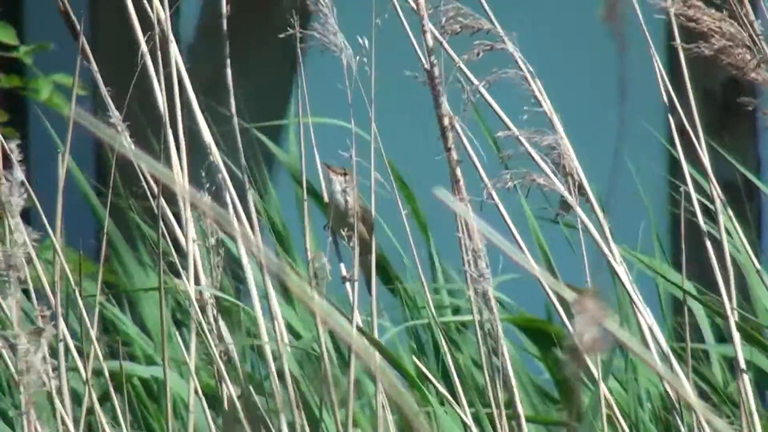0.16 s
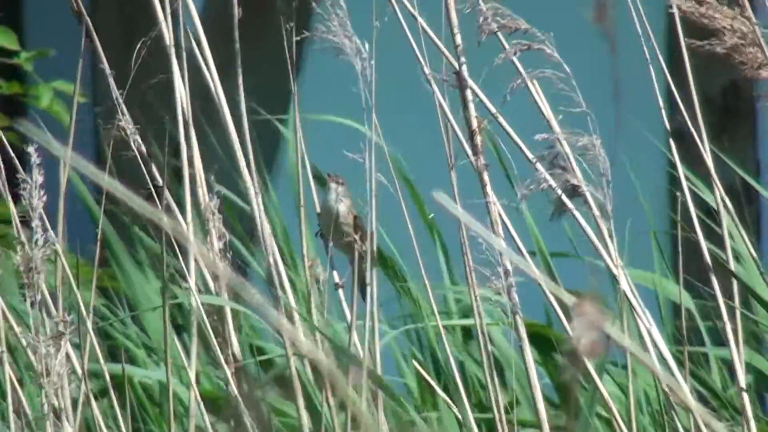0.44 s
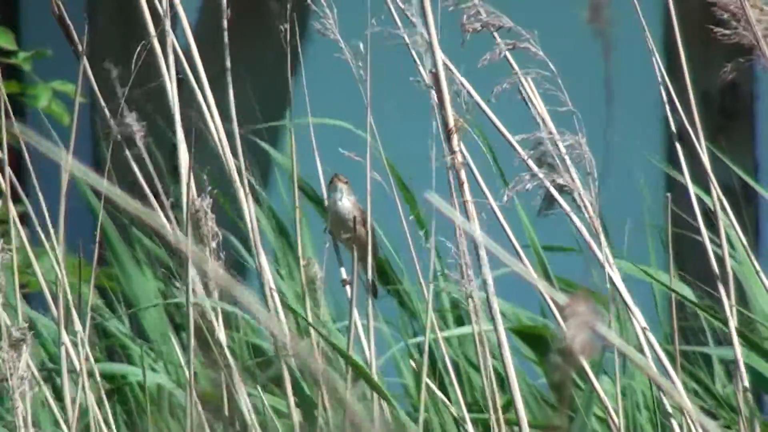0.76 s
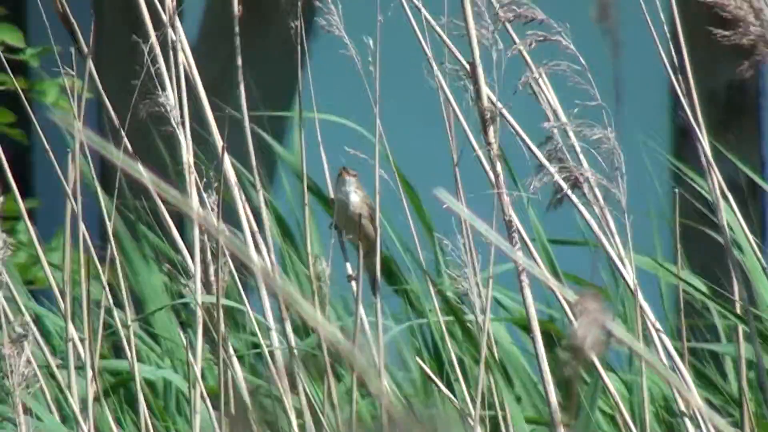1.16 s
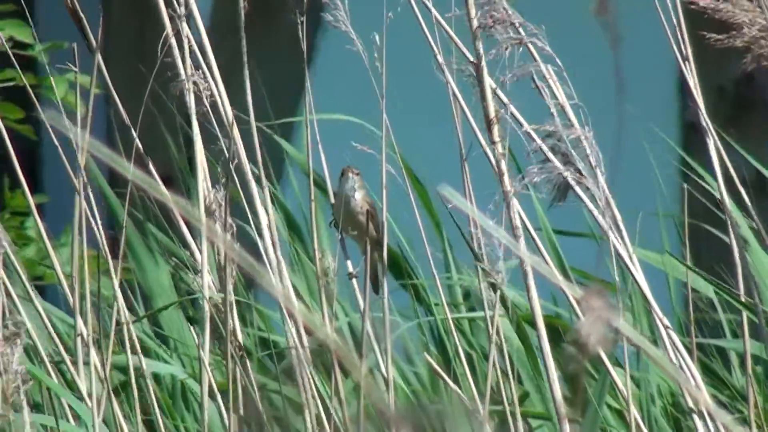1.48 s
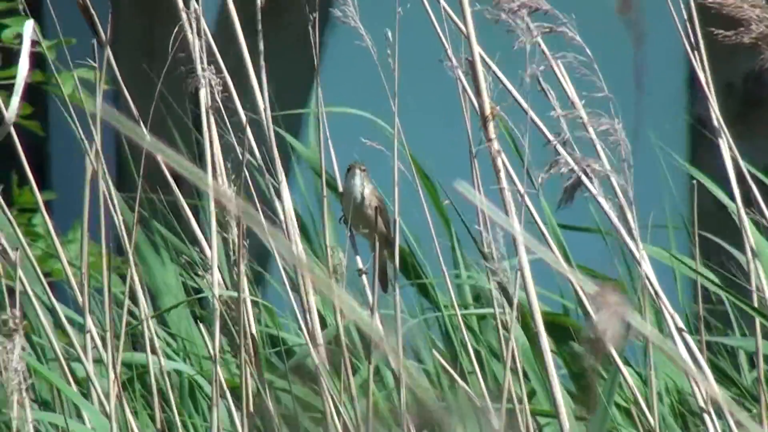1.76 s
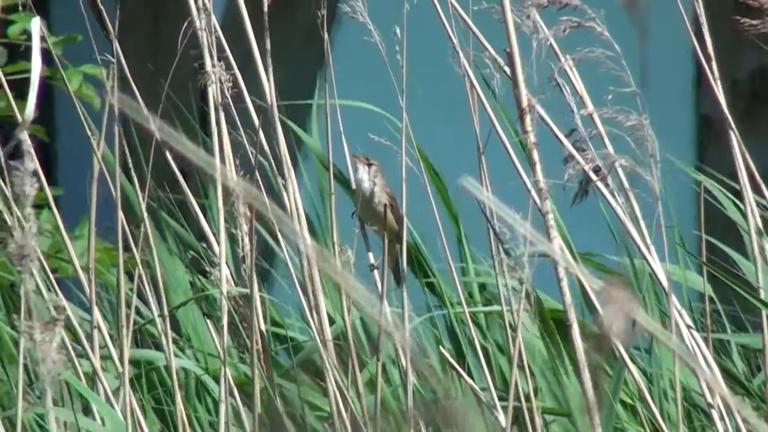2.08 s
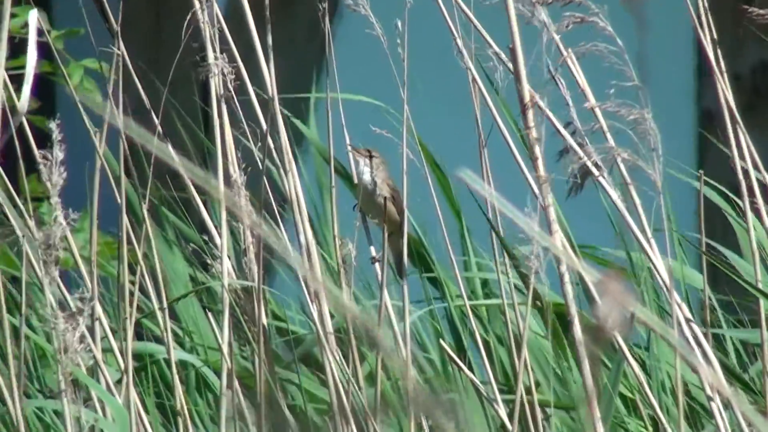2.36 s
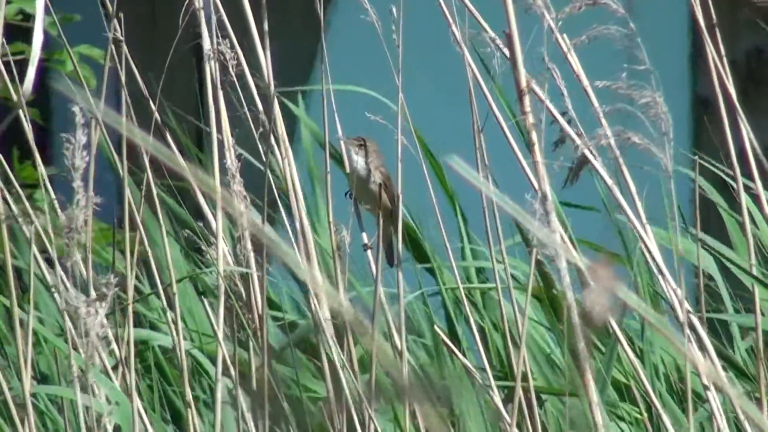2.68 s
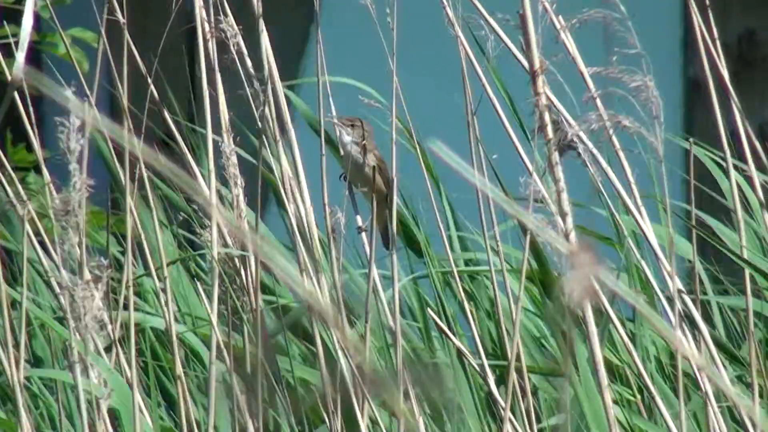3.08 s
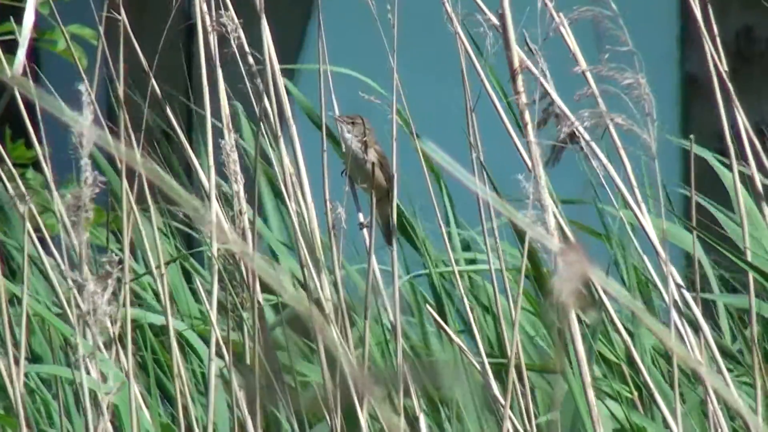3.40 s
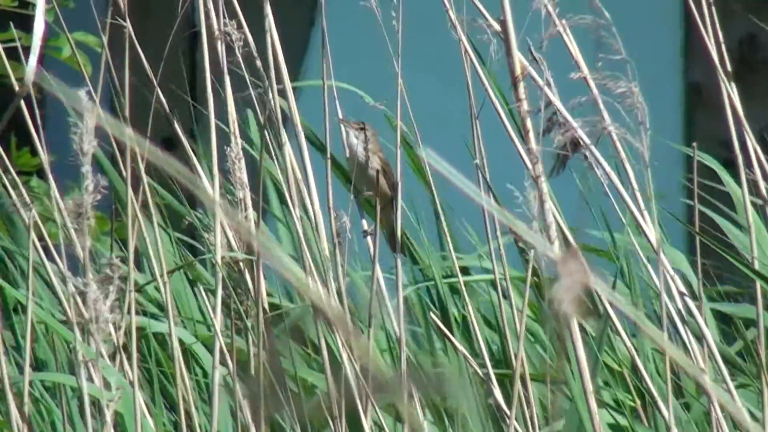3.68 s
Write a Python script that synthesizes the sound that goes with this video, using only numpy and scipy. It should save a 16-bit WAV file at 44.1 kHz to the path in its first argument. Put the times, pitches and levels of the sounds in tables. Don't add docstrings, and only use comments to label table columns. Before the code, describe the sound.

Small bird chatters and trills in short bursts among reeds, with low soft wind behind.

```python
import sys
import numpy as np
from scipy import signal
from scipy.fft import rfft, irfft
from scipy.io import wavfile
from scipy.ndimage import uniform_filter1d

SR = 44100
rng = np.random.default_rng(int(sys.argv[2]) if len(sys.argv) > 2 else 0)


def wav_out(sig):
    wavfile.write(sys.argv[1], SR, np.round(np.clip(np.atleast_2d(sig).T, -1, 1) * 32767).astype(np.int16))


def attenuation_scalar(level_db):
    decades = np.asarray(level_db, float) / 20
    return 10 ** decades


N = 169344
t = np.arange(N) / SR


def along(table, hz):
    points = np.array(table)
    return np.interp(np.log(hz), np.log(points[:, 0]), points[:, 1])


def walk(rate, size):
    k = max(int(SR / rate), 1)
    noise = rng.standard_normal(size + 2 * k)
    smooth = uniform_filter1d(uniform_filter1d(noise, k), k)
    return smooth[k:k + size] * np.sqrt(1.82 * k)


def turns(hz, wobble):
    unsteady_hz = hz * (1 + wobble * walk(130.8, len(hz)))
    return 2 * np.pi * np.cumsum(unsteady_hz) / SR


def add(out, start, x):
    i = int(start * SR)
    out[max(i, 0):i + len(x)] += x[max(-i, 0):N - i]


# f/Hz, level/dB
THROAT_RESONANCE = [(700, -33), (1500, -10), (2500, -6), (3700, 8.5), (4600, -1.5), (6000, -24.5),
                    (9000, -42.5), (12000, -49.5)]


def voice(hz, rough, tilt_db, beak_hz=3700, beak_db=0, odd_db=0, throat=1):
    beak_width_hz, breath_hz, breath_level = 250, 3724, 1.45
    k = np.arange(1, 13)[:, None]
    throat_db = throat * along(THROAT_RESONANCE, k * hz)
    beak_peak_db = beak_db / (1 + ((k * hz - beak_hz) / beak_width_hz) ** 2)
    gain = attenuation_scalar(throat_db + tilt_db * np.log2(k) + odd_db * (k % 2) + beak_peak_db)
    gain = gain * (k * hz < SR / 2)
    tone = np.sum(gain * np.sin(k * turns(hz, 0.0034) + k ** 2), axis=0)
    tone = tone * np.sqrt(2 / np.sum(gain ** 2, axis=0))
    hiss = breath_level * rough * walk(2400, len(hz)) * np.sin(turns(breath_hz + 0 * hz, 0.0453))
    flutter = 1 + rough * walk(1500, len(hz)) + 0.13 * walk(123, len(hz))
    return tone * flutter + hiss


def note(out, start, length, db, hz0, hz1, bend, rough, tilt_db, soft, scoop=0, lean=1, **beak):
    scoop_s = 0.0057
    u = np.linspace(0, 1, int(length * SR))
    hz = hz0 + (hz1 - hz0) * u ** bend
    hz = hz * (1 - scoop * np.exp(-u * length / scoop_s))
    swell = np.abs(np.sin(np.pi * u ** lean)) ** soft
    add(out, start, attenuation_scalar(db) * swell * voice(hz, rough, tilt_db, **beak))


def whistle(out, curve, rough, tilt_db):
    s, hz, db = np.array(curve).T
    at = np.arange(s[0], s[-1], 1 / SR)
    edge = np.clip(np.minimum(at - s[0], s[-1] - at) / 0.0042, 0, 1)
    smooth_hz = uniform_filter1d(np.interp(at, s, hz), 200)
    add(out, s[0], edge * attenuation_scalar(np.interp(at, s, db)) * voice(smooth_hz, rough, tilt_db))


# t/s, f/Hz, level/dB
FALLING_WHISTLE = [
    (.808, 1873, -39),
    (0.826, 1613, -36),
    (0.854, 1459, -42),
    (0.929, 1491, -34.5),
    (0.966, 1508, -32),
    (0.988, 1310, -27),
    (1.005, 1055, -36),
    (1.02, 847, -35),
]
ARCHED_WHISTLE = [
    (1.101, 1600, -31),
    (1.114, 1160, -31),
    (1.159, 1160, -31.5),
    (1.185, 1214, -34),
    (1.22, 1276, -26.5),
    (1.249, 1276, -25),
    (1.273, 1163, -32),
    (1.291, 867, -44),
]
THIN_WHISTLE = [
    (1.889, 2580, -32.5),
    (1.924, 2152, -51.5),
    (1.99, 2065, -39.5),
    (2.032, 2100, -38),
    (2.045, 2070, -27),
]


def whistles(out):
    whistle(out, FALLING_WHISTLE, rough=0.17, tilt_db=5.0)
    whistle(out, ARCHED_WHISTLE, rough=0.09, tilt_db=2.5)
    whistle(out, THIN_WHISTLE, rough=0.25, tilt_db=8.5)


# start t/s, length t/s, level/dB, f/Hz, lateness of the sag [power]
PLAIN_CHURRS = [
    (0.117, 0.056, -33.5, 865, 6.2),
    (0.179, 0.043, -31, 859, 5.1),
    (0.246, 0.043, -32.5, 829, 2.56),
    (2.01, 0.032, -39.5, 705, 4.5),
]
# start t/s, length t/s, level/dB, f/Hz, odd harmonics level/dB
DOUBLED_CHURRS = [
    (2.062, 0.036, -36.5, 729, -7),
    (2.126, 0.035, -34, 762, -9),
    (2.214, 0.036, -34, 776, -4),
]


def churrs(out):
    for s, length, db, hz, odd_db in DOUBLED_CHURRS:
        note(out, s, length, db, hz, hz * .84, bend=4.0, rough=.27, tilt_db=4.5, throat=0.7,
             soft=0.42, scoop=.14, beak_hz=3000, beak_db=5.5, odd_db=odd_db)
    for s, length, db, hz, bend in PLAIN_CHURRS:
        sagged_hz = hz * (1 - .19)
        note(out, s, length, db, hz, sagged_hz, bend=bend, rough=.19, tilt_db=2.0, throat=0.71,
             lean=1.08, soft=0.61, scoop=0.061, beak_hz=3300, beak_db=11)


def rasps(out):
    note(out, 2.855, .034, -41, 1650, 2300, bend=1, rough=.9, tilt_db=6, soft=.6)
    note(out, 3.243, .032, -44, 2000, 1850, bend=1, rough=1.0, tilt_db=6, soft=.6)
    note(out, .04, .08, -49, 2130, 1900, bend=.6, rough=.8, tilt_db=6, soft=.3)
    note(out, -0.018, 0.0455, -41.0, 1800, 1650, bend=0.91, rough=0.65, tilt_db=9, soft=0.46)


# start t/s, length t/s, level/dB, start f/Hz, end f/Hz
SLUR_NOTES = [
    (.037, 0.075, -43, 2800, 2654),
    (1.889, 0.019, -31.5, 2053, 1786),
    (2.794, 0.044, -43.5, 1740, 2650),
    (2.817, 0.039, -39.5, 2007, 1878),
    (3.504, 0.033, -42, 1877, 2324),
    (3.51, 0.041, -42.5, 1510, 1738),
]
# start t/s, length t/s, level/dB, start f/Hz, end f/Hz
FLICK_NOTES = [(1.875, 0.024, -36, 4580, 2100), (2.906, 0.013, -36, 1550, 2450),
               (2.913, 0.0173, -38, 2524, 3390), (2.923, 0.011, -35, 2450, 1600),
               (2.996, 0.008, -39, 1700, 2600), (2.998, .01, -42, 2100, 2600),
               (3.074, .012, -42, 3650, 3150), (3.002, 0.016, -38, 2515, 1400),
               (3.007, 0.0126, -39.5, 2530, 3340), (1.453, 0.011, -40, 1200, 2150),
               (0.413, 0.013, -42.5, 3560, 3300), (2.391, 0.009, -39, 3300, 2850)]


def slurs_and_flicks(out):
    for row in SLUR_NOTES:
        note(out, *row, bend=0.45, rough=0.33, tilt_db=3.0, soft=0.18, throat=0.84)
    for row in FLICK_NOTES:
        note(out, *row, bend=1, rough=.3, tilt_db=2, soft=.7)


# start t/s, length t/s, level/dB, start f/Hz
CHIRP_NOTES = [
    (1.434, 0.027, -31, 1490),
    (1.486, 0.03, -29.5, 1654),
    (1.647, 0.025, -28.5, 1547),
    (1.697, 0.03, -29, 1598),
]


def chirps(out):
    top_hz, partner_hz, partner_late_s = 2007, 2768, 0.0033
    partner_db, sum_db = -10.5, -17
    for start, length, db, hz0 in CHIRP_NOTES:
        u = np.linspace(0, 1, int(length * SR))
        hz = top_hz + (hz0 - top_hz) * np.exp(-u / 0.3)
        other = partner_hz * (1 - 0.0743 * np.exp(-u / 0.355))
        mix = np.sin(turns(hz + other, 0.0069))
        mix = mix + 0.74 * np.sin(turns(2 * other, 0.0036))
        mix = mix + 0.49 * np.sin(turns(2.3 * other, 0.0048))
        partner = attenuation_scalar(partner_db) * np.sin(turns(other, 0.0052)) + attenuation_scalar(sum_db) * mix
        swell = np.abs(np.sin(np.pi * u ** 1.12)) ** .9
        add(out, start, attenuation_scalar(db) * swell * voice(hz, 0.26, 1.5, throat=1.2))
        add(out, start + partner_late_s, attenuation_scalar(db) * np.sin(np.pi * u) ** 0.42 * partner)


# t/s, level/dB
TRILL_PIPS = [
    [(0.4369, -28), (0.4628, -23.5), (0.4898, -24), (0.5167, -22), (0.5424, -23.5), (0.5684, -23),
     (0.5945, -23)],
    [(2.4159, -28), (2.4409, -27.5), (2.4668, -25.5), (2.4957, -24.5), (2.5207, -24.5), (2.5486, -22.5),
     (2.5765, -26), (2.603, -26.5)],
]
# t/s, level/dB
CLOSING_PIPS = [
    (3.561, -35),
    (3.582, -30.5),
    (3.603, -29),
    (3.627, -30),
    (3.649, -29.5),
    (3.673, -32.5),
]


def trills(out):
    for pips in TRILL_PIPS:
        lateness = np.linspace(0, 1, len(pips)) ** 1.48
        for (s, db), late in zip(pips, lateness):
            def blend(first, last):
                return first + (last - first) * late

            hz = blend(1936, 1900)
            note(out, s - blend(.004, .001), blend(.012, 0.0237), db - 3, hz, hz * (1 - blend(0.079, 0.14)),
                 bend=blend(4.5, 2.2), rough=0.14, tilt_db=2.5, soft=0.8, lean=blend(1.4, .9))
    pip_hz, join_hz, join_db = 2650, 1843, -5.5
    lengths = np.linspace(0.012, 0.017, len(CLOSING_PIPS))
    for k, (s, db) in enumerate(CLOSING_PIPS):
        note(out, s - .002, lengths[k], db - 2.5, pip_hz * .98, pip_hz * 1.025,
             bend=1, rough=0.25, tilt_db=-21.0, soft=1.6)
        if 2 * k >= len(CLOSING_PIPS):
            note(out, s - .002, lengths[k] * 1.1, db + join_db, join_hz, join_hz * .92,
                 bend=0.96, rough=0.19, tilt_db=-1.0, soft=0.66, throat=0.65)


# t/s, level/dB
RATTLE_LEVEL = [
    (3.072, -46),
    (3.1, -42),
    (3.15, -40.5),
    (3.19, -37),
    (3.24, -41),
    (3.275, -47),
]


def rattle(out):
    puff_rate_hz, main_hz, drone_hz, upper_hz = 165, 3020, 2640, 4120
    s, db = np.array(RATTLE_LEVEL).T
    at = np.arange(s[0], s[-1], 1 / SR)
    beat = turns(puff_rate_hz + 0 * at, 0.074)
    puff = (.5 - .5 * np.cos(beat)) * attenuation_scalar(2 * walk(104, len(at)))
    effort = 0.0389 * np.exp(-((at - 3.19) / 0.0306) ** 2)
    sweep = 1 + .035 * np.sin(beat) + effort
    main = 2.37 * np.sin(turns(main_hz * sweep, 0.0125)) * (1 + 0.2 * walk(3000, len(at)))
    upper = (.25 + .45 * walk(2000, len(at))) * np.sin(turns(upper_hz * sweep, 0.024))
    drone = .3 * np.sin(turns(drone_hz + 0 * at, 0.011))
    add(out, s[0], (puff * (main + upper) + drone) * attenuation_scalar(np.interp(at, s, db)))


def warbler():
    out = np.zeros(N)
    whistles(out)
    churrs(out)
    rasps(out)
    slurs_and_flicks(out)
    chirps(out)
    trills(out)
    rattle(out)
    return out


# delay t/s, level/dB, left over right level/dB
WALL_ECHOES = [
    (.053, -12, -3),
    (0.1, -28, -3.5),
]


def reeds():
    u = t[:SR // 2]
    bird_pan_db = -0.3

    def tail(db, t60):
        fade_in = np.clip(u / 0.0083, 0, 1)
        return attenuation_scalar(db - 60 * u / t60) * np.sqrt(2 * np.log(1000) / t60 / SR) * fade_in

    shared = np.sqrt(0.85) * rng.standard_normal(len(u))
    own = np.sqrt(1 - 0.85) * rng.standard_normal((2, len(u)))
    out = (shared + own) * (tail(-9, 0.088) + tail(-11, 0.51))
    out[1, 1] = 0.63
    out[:, 0] = [1, .5] * attenuation_scalar(np.array([bird_pan_db, -bird_pan_db]) / 2)
    for late, db, pan_db in WALL_ECHOES:
        out[:, int(late * SR)] += attenuation_scalar(db + np.array([pan_db, -pan_db]) / 2)
    return out


# f/Hz, level/dB, time to fade by 60 dB t/s
STEM_TONES = [
    (1300, 0, .010),
    (1800, -2, .022),
    (1050, -7, .03),
    (7600, 2, .0025),
    (9300, -2, .0025),
]


def crack():
    crack_s, crack_db, splinter_db, splinter_t60_s = .5853, -20, -10, .012
    out = np.zeros((2, N))
    u = t[:3000]
    ring = sum(attenuation_scalar(db) * np.sin(2 * np.pi * hz * u) * attenuation_scalar(-60 * u / t60) for hz, db, t60 in STEM_TONES) / 2
    for late, db in [(0, 0), (.0004, 8.5), (.0018, 1.5)]:
        noise = uniform_filter1d(rng.standard_normal(len(u)), size=3)
        splinters = attenuation_scalar(splinter_db - 60 * u / splinter_t60_s) * noise
        x = attenuation_scalar(crack_db + db) * (ring + splinters)
        add(out[0], crack_s + late, 0.83 * x)
        add(out[1], crack_s + late, x)
    return signal.sosfilt(signal.butter(2, 800, "high", fs=SR, output="sos"), out)


# start t/s, length t/s, level/dB, start f/Hz, end f/Hz
FAR_CALLS = [
    (.72, 0.13, -68, 3480, 3470),
    (1.05, 0.15, -46, 3320, 3370),
    (1.78, 0.12, -53, 8720, 8080),
    (1.88, .1, -61, 8100, 7900),
    (.29, 0.062, -60.5, 10600, 10380),
    (2.75, 0.05, -56, 3480, 3500),
    (2.74, .05, -58, 4400, 4400),
    (2.74, .05, -58, 2950, 2900),
    (3.27, 0.22, -57, 1900, 1715),
]


def far_birds():
    out = np.zeros((2, N))
    for s, length, db, hz0, hz1 in FAR_CALLS:
        u = np.linspace(0, 1, int(length * SR))
        pan_db = 2.0 * rng.standard_normal()
        tone = np.sin(turns(hz0 + (hz1 - hz0) * u, 0.0043))
        x = attenuation_scalar(db + 2.7 * walk(94, len(u))) * np.sin(np.pi * u) ** .5 * tone
        add(out[0], s, x * attenuation_scalar(pan_db))
        add(out[1], s, x * attenuation_scalar(-pan_db))
    return out


# f/Hz, level/dB
WIND_TONE = [(15, -40), (28, -1.5), (76, -1.5), (677, -8.5), (1500, -16), (3500, -20), (10700, -28.5),
             (16000, -35)]
# f/Hz, level/dB
WIND_WIDTH = [(30, -25), (70, -25), (200, -24.5), (700, -14), (4000, -5.5), (9000, -22)]
# t/s, level/dB
WIND_GUST = [
    (0, -51),
    (1.8, -52),
    (2.55, -48),
    (3, -51),
    (3.84, -48),
]


def wind():
    hz = np.maximum(np.arange(N // 2 + 1) * SR / N, 1)
    mid, side = rfft(rng.standard_normal((2, N))) * attenuation_scalar(along(WIND_TONE, hz))
    side = side * attenuation_scalar(along(WIND_WIDTH, hz))
    gust_db = np.interp(t, *np.array(WIND_GUST).T)
    ref = np.sqrt(2 * np.sum(np.abs(mid[(hz > 150) & (hz < 500)]) ** 2)) / N
    out = 0
    for centre in 2 ** np.arange(4, 14.6, .5):
        band = np.cos(np.pi / 2 * np.clip(2 * np.log2(hz / centre), -1, 1)) ** 2
        swell_db = (gust_db - gust_db.mean()) * min(400 / centre, 1)
        flicker_db = 1.0 * walk(3.1, N) + 1.6 * walk(11.5, N)
        db = gust_db.mean() + swell_db + flicker_db
        out = out + attenuation_scalar(db) / ref * irfft(band * np.array([mid + side, mid - side]), N)
    return out


def scene():
    snap, far = crack(), far_birds()
    sources = warbler() + 0.05 * snap[0] + far[0]
    echoing = signal.fftconvolve(sources[None], reeds(), axes=1)[:, :N]
    return echoing + snap + far / 2 + wind()


def band_limit(x):
    return signal.sosfilt(signal.butter(12, 15820, fs=SR, output="sos"), x)


def record(dry):
    return band_limit(dry)


dry = scene()
out = record(dry)
wav_out(out)
```